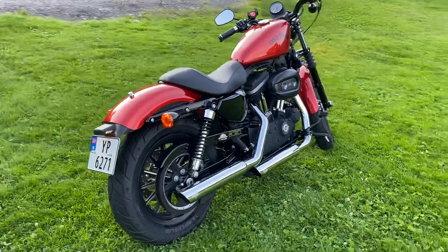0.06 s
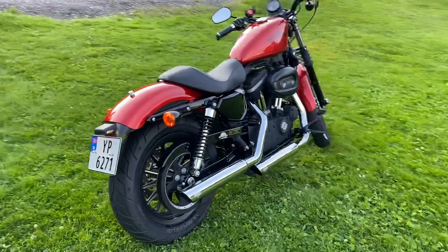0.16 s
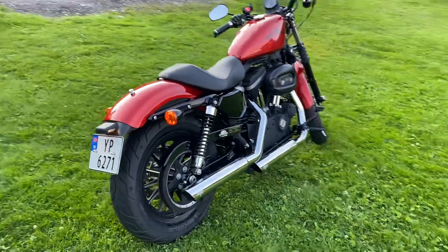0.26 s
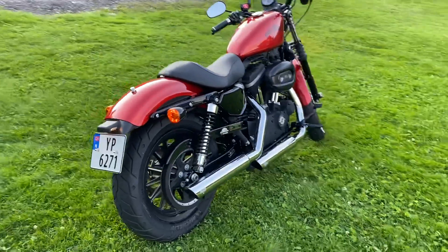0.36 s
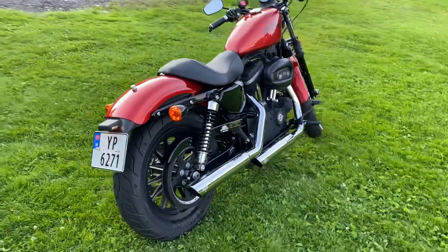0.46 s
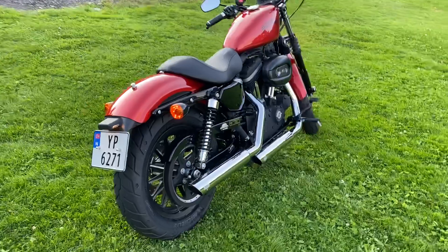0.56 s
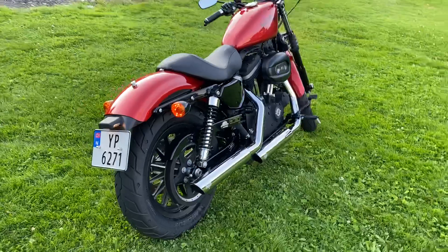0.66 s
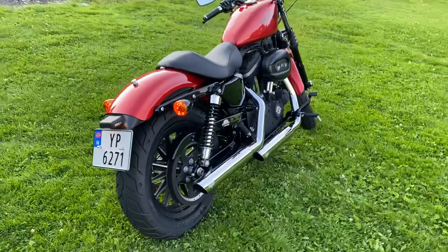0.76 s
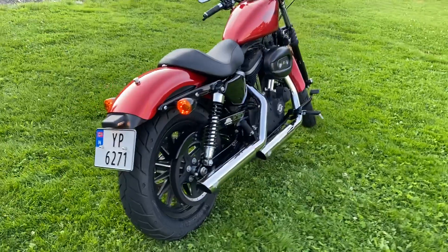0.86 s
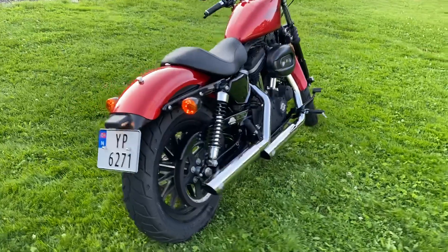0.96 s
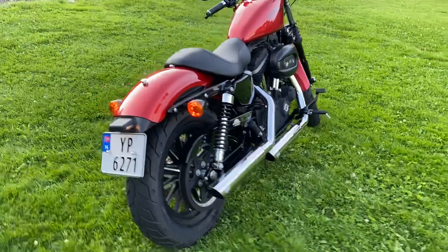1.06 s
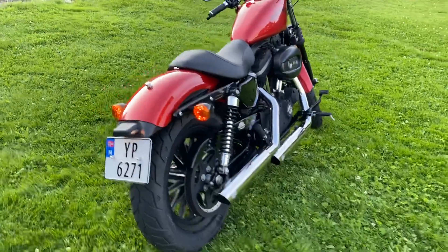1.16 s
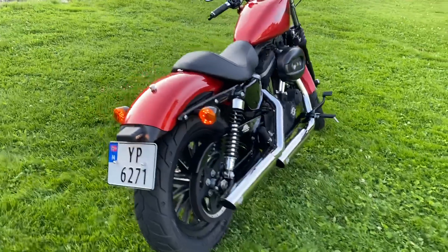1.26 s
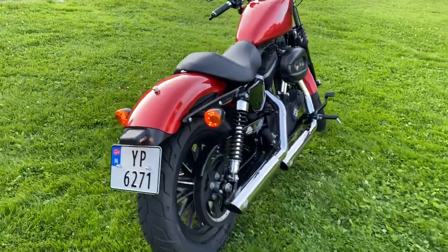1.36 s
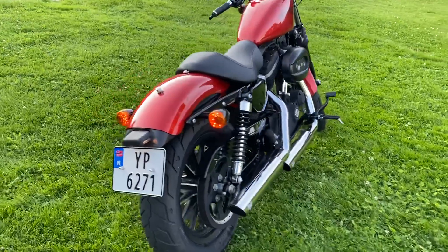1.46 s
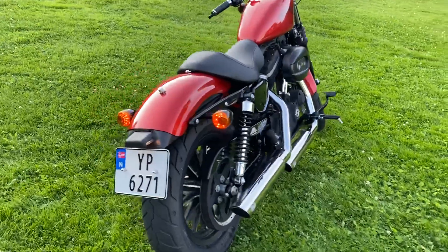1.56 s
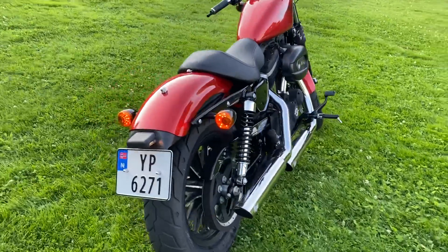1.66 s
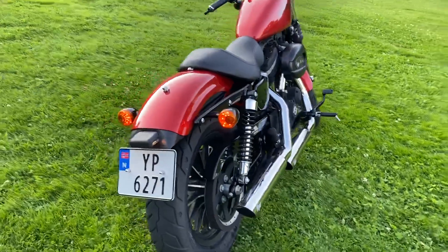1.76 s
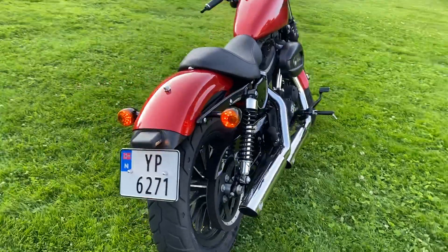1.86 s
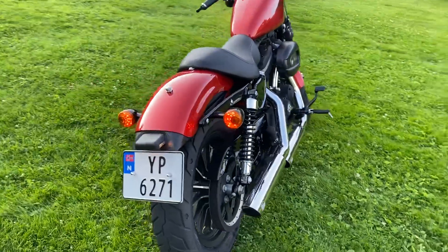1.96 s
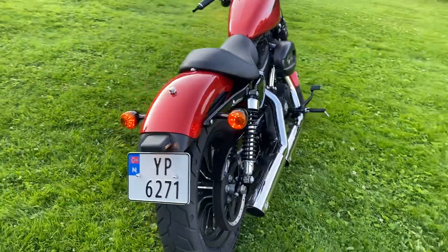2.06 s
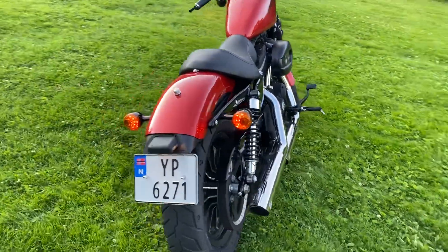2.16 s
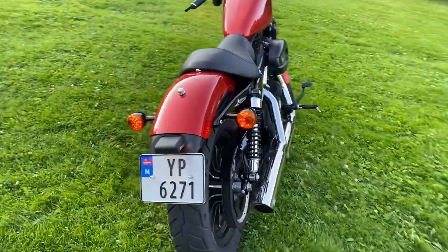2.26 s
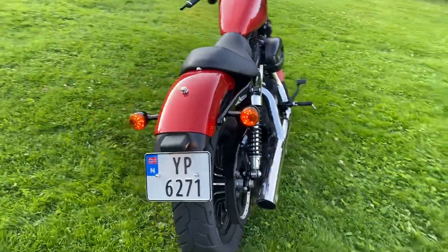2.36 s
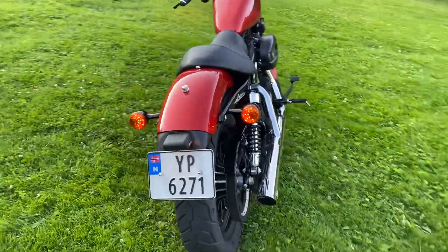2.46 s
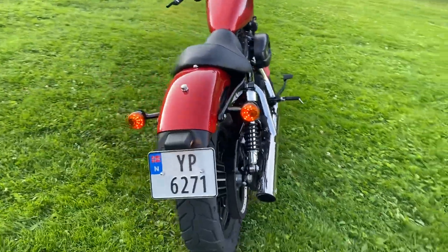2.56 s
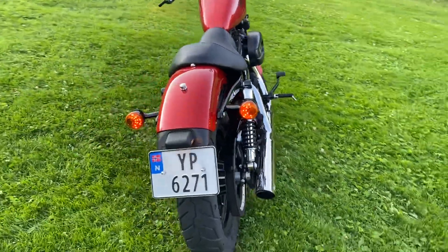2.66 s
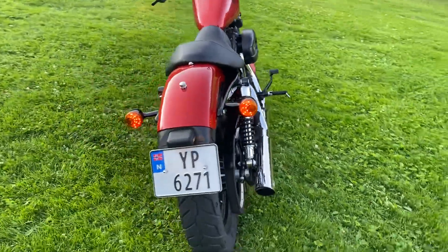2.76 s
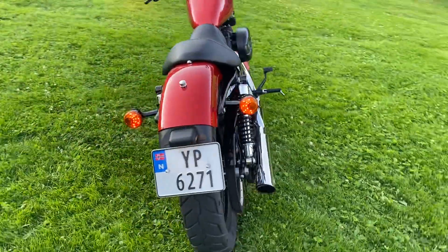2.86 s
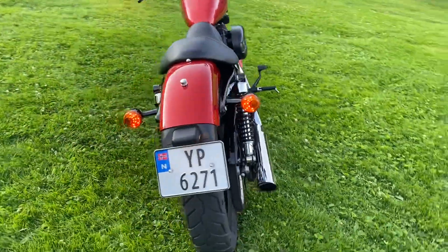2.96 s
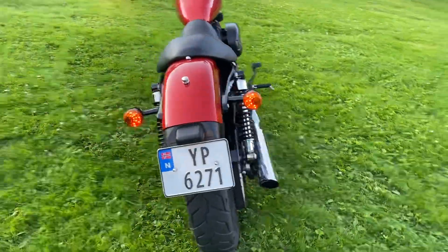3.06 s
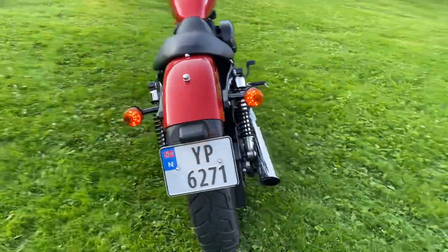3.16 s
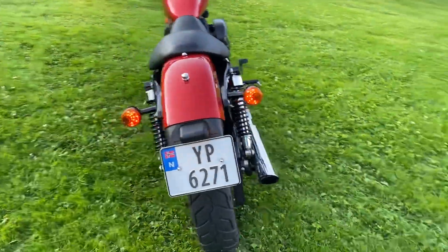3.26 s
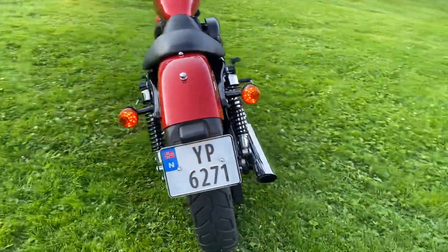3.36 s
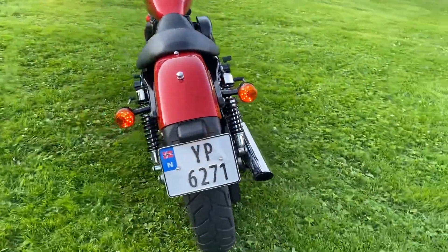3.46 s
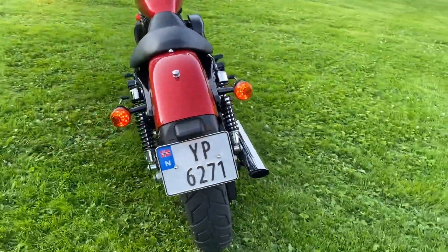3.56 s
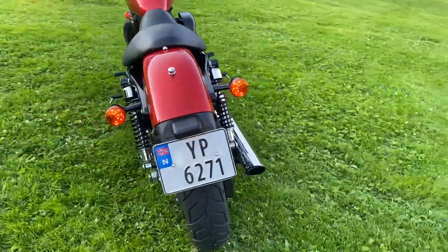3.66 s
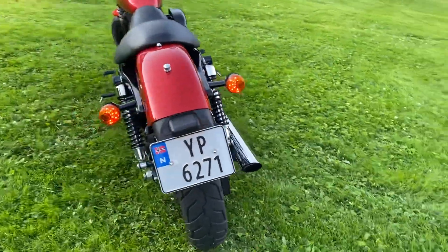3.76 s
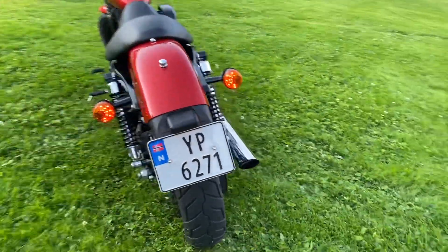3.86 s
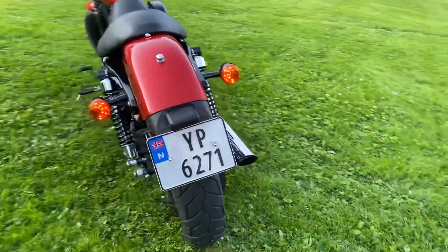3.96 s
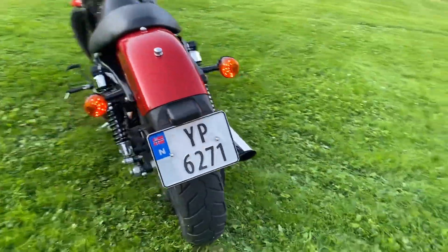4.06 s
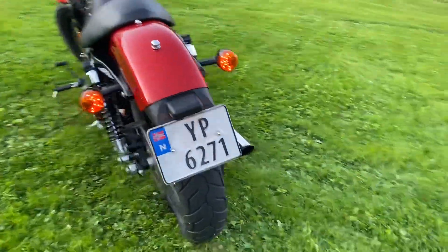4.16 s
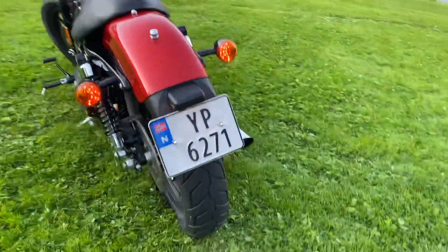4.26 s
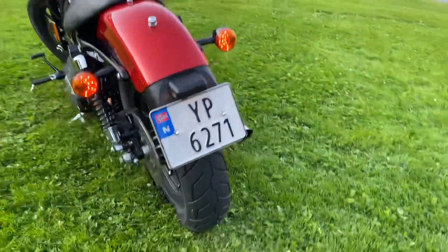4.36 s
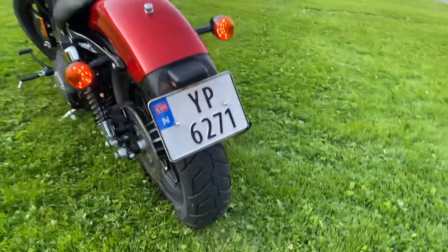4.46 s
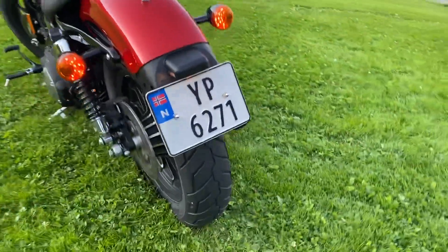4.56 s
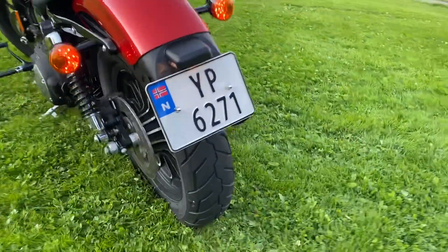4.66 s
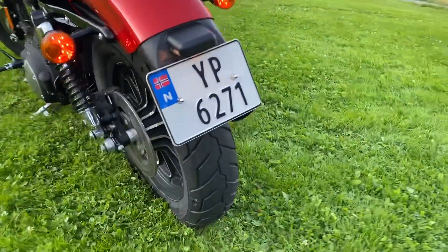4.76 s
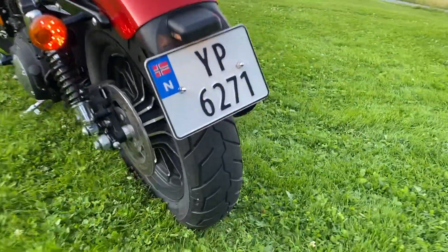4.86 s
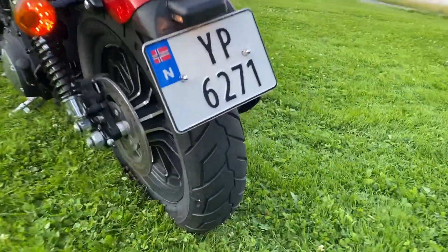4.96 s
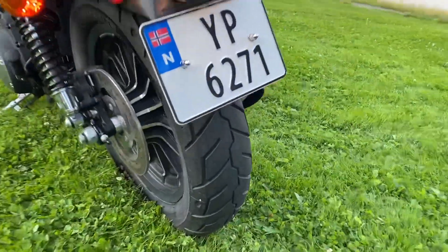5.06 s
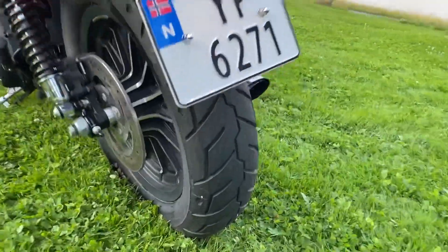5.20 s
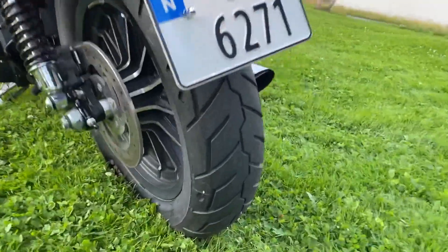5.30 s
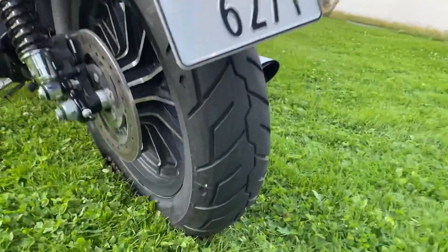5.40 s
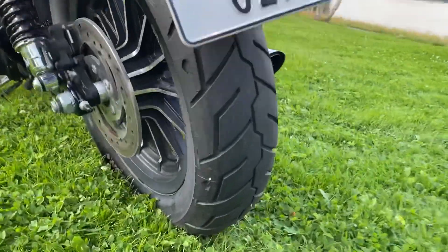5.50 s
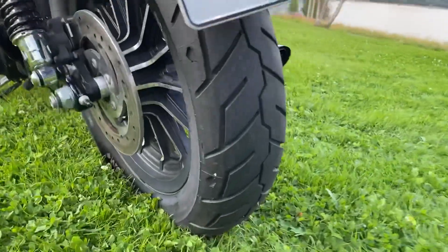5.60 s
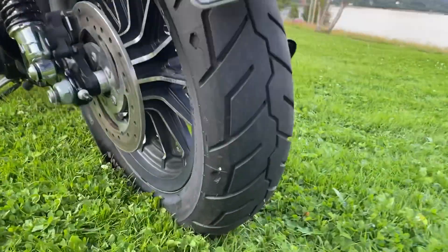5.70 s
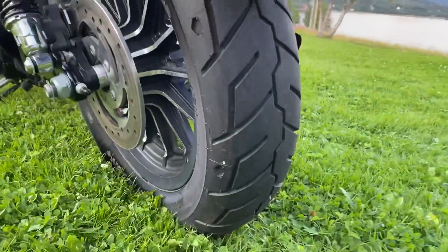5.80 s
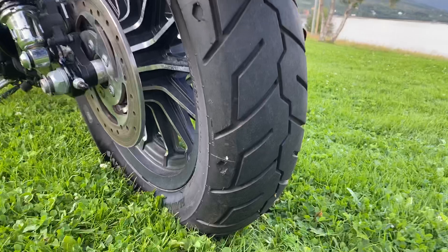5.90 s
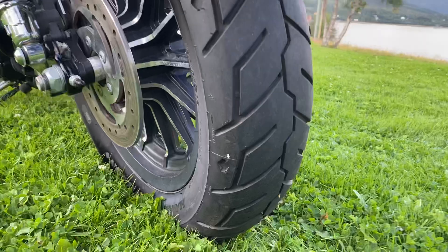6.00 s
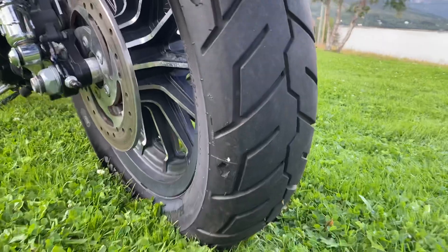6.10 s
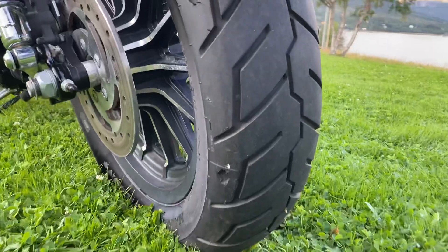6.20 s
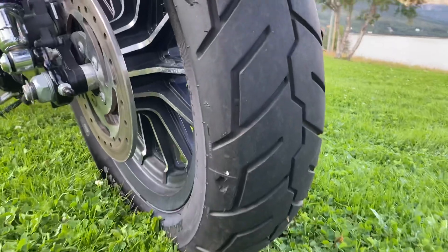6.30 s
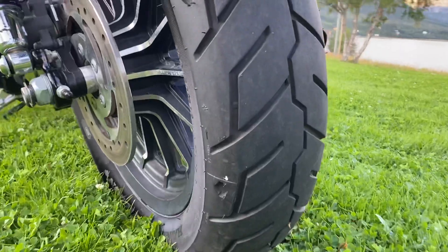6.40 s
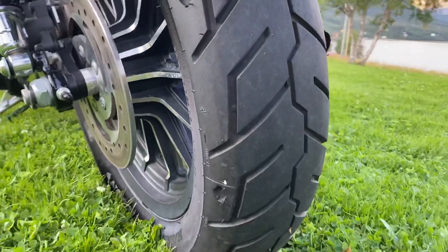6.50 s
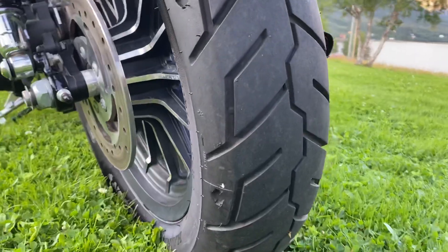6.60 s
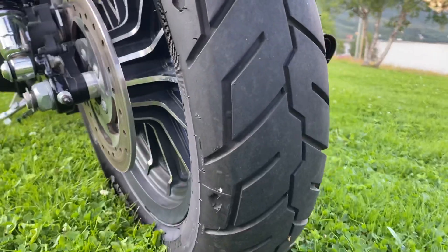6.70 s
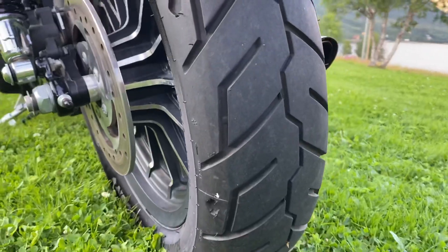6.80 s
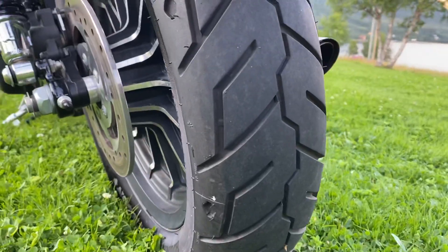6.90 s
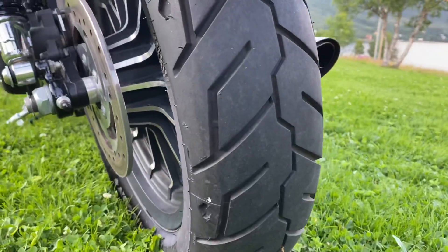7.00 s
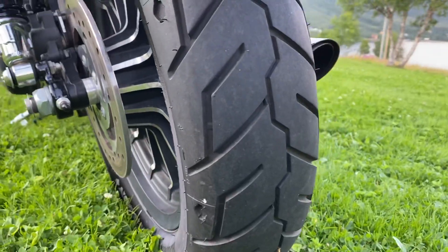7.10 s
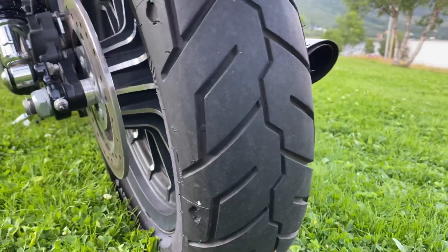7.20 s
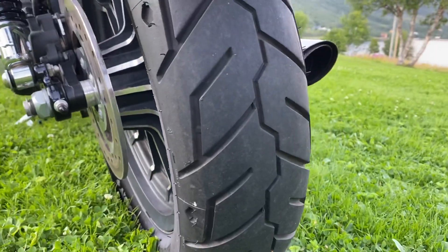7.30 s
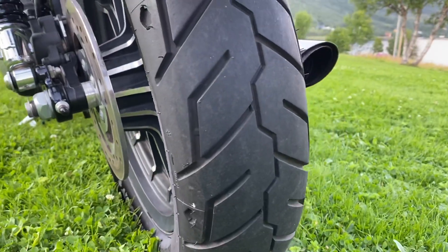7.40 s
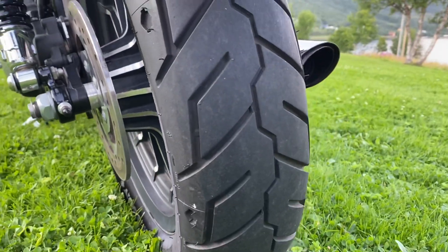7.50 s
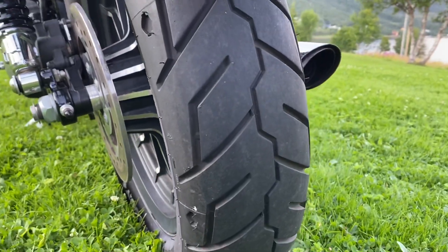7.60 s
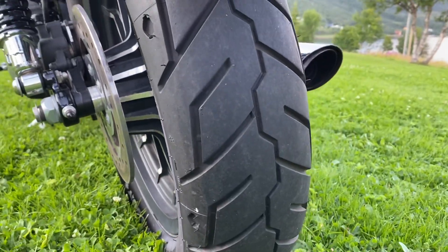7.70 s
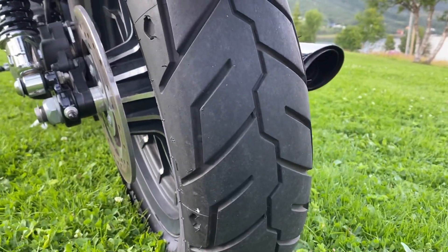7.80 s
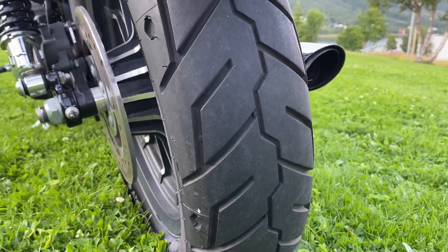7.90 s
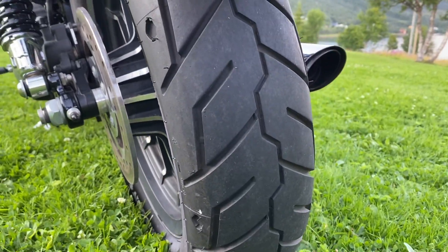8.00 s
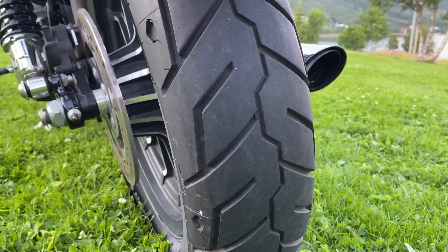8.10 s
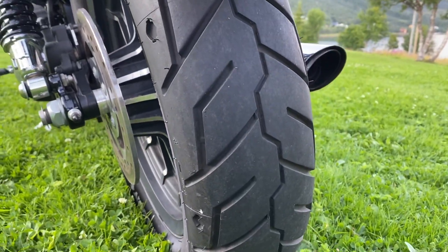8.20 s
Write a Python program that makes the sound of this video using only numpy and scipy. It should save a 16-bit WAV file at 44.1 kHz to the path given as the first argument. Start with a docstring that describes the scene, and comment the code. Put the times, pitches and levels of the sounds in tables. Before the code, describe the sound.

Close outdoor idle of a big two-cylinder motorcycle: fast loping exhaust thumps, sharp hissing cracks and light valve clatter, growing heavier near the pipe.

```python
"""On a lawn a V-twin motorcycle idles; the microphone circles behind it and comes down by the rear wheel.
Each exhaust stroke drives gas surges through a resonant silencer, heard as a thump, and a turbulent jet
out of the pipe mouth, heard as bark, crack and hiss. The pipe end and the hollow machine ring briefly.
One cylinder fires every cycle; the other mostly misses every second one and then cracks harder.
Shaped noise gives the clatter of the valve gear and the rumble of the engine case beneath."""
import sys
import numpy as np
from scipy import signal
from scipy.fft import rfft, irfft, next_fast_len
from scipy.io import wavfile

SR = 44100
rng = np.random.default_rng(int(sys.argv[2]) if len(sys.argv) > 2 else 0)


def generate_wav(sig):
    """Save sig (samples, or channels by samples) to the path in sys.argv[1] as 16-bit PCM at SR."""
    pcm = np.round(np.clip(np.atleast_2d(sig).T, -1, 1) * 32767).astype(np.int16)
    wavfile.write(sys.argv[1], SR, pcm)


N = 363825

# exhaust strokes of a burnt charge: start_s, crack_db, bark_db (relative levels)
STEADY_FIRES = [(0.0149, -24, -19.5), (.1116, -21.5, -18), (.2098, -23.5, -21.5), (.3055, -26, -24.5),
                (0.399, -21.5, -16), (.4944, -26, -19.5), (.5932, -25.5, -23.5), (.693, -26.5, -22.5),
                (0.79, -25.5, -20), (.8858, -25.5, -24), (.983, -25, -23), (1.0793, -25, -23),
                (1.1759, -24.5, -21.5), (1.2747, -26, -21.5), (1.371, -27, -21.5), (1.4681, -23.5, -22),
                (1.5644, -26, -21), (1.66, -24, -21), (1.7554, -23.5, -24), (1.8506, -23.5, -21.5),
                (1.9441, -19, -15.5), (2.0392, -20, -18.5), (2.1359, -20, -17.5), (2.2347, -25, -23.5),
                (2.3359, -25, -20.5), (2.4363, -23.5, -16.5), (2.5352, -24, -20.5), (2.6327, -23.5, -21),
                (2.732, -23.5, -20), (2.8332, -24.5, -21), (2.9331, -25, -20), (3.03, -23.5, -23),
                (3.1272, -27, -24), (3.225, -29, -21.5), (3.3226, -27.5, -18.5), (3.4235, -37, -25),
                (3.5194, -32, -25), (3.6135, -34, -21.5), (3.7087, -31, -21), (3.8054, -32.5, -22.5),
                (3.9007, -33, -20), (3.998, -36.5, -21.5), (4.0958, -32, -21.5), (4.1947, -37, -20.5),
                (4.2939, -33, -19.5), (4.3944, -38, -24), (4.4909, -33.5, -19), (4.5878, -32, -18.5),
                (4.687, -34, -19.5), (4.787, -33.5, -19.5), (4.8845, -34.5, -21), (4.9811, -35, -18.5),
                (5.0806, -32.5, -17), (5.1849, -33, -20.5), (5.2858, -29.5, -18), (5.386, -29, -17),
                (5.4846, -28, -18), (5.5847, -27, -19.5), (5.6857, -29, -20), (5.788, -31, -19.5),
                (5.888, -31, -23.5), (5.986, -29, -20.5), (6.0817, -27, -22), (6.1765, -24, -19.5),
                (6.271, -30.5, -24), (6.3669, -27.5, -22.5), (6.4674, -26.5, -24), (6.563, -28.5, -25.5),
                (6.6604, -27.5, -21), (6.7556, -26.5, -26), (6.8513, -29, -17.5), (6.9496, -26.5, -21.5),
                (7.0497, -23.5, -19), (7.1495, -24, -21), (7.2497, -25.5, -21.5), (7.3486, -25, -22),
                (7.4482, -24.5, -20.5), (7.5457, -24, -18), (7.645, -24, -20), (7.746, -24, -21),
                (7.847, -25.5, -21.5), (7.9461, -22, -17), (8.0488, -24.5, -21.5), (8.1513, -26.5, -22)]
LAZY_FIRES = [(0.153, -25, -19), (.345, -24, -21), (.5359, -22.5, -20.5), (0.7347, -26, -22),
              (.927, -23, -19), (1.023, -30.5, -23), (1.119, -26, -21.5), (1.2163, -32, -25.5),
              (1.315, -24.5, -21), (1.5101, -16, -16), (1.701, -17.5, -16.5), (1.891, -16.5, -16),
              (2.0807, -15, -16), (2.2781, -13, -15.5), (2.4795, -18, -16), (2.6749, -17, -15),
              (2.8756, -22.5, -19.5), (2.9725, -31.5, -28.5), (3.0708, -22.5, -22.5), (3.167, -33.5, -34),
              (3.2662, -23, -20.5), (3.4646, -20, -20.5), (3.6538, -18.5, -17), (3.8465, -19.5, -18.5),
              (4.0391, -18.5, -16.5), (4.2372, -19, -16.5), (4.4361, -17, -18.5), (4.6292, -18.5, -22),
              (4.8283, -25, -20.5), (5.023, -18.5, -16), (5.2283, -16, -13), (5.4283, -17, -17),
              (5.6279, -15.5, -16.5), (5.8305, -15, -15.5), (6.027, -16, -15.5), (6.2171, -15, -13.5),
              (6.4089, -17, -22), (6.5077, -21, -22.5), (6.7011, -16, -16.5), (6.893, -14, -14),
              (7.0928, -14.5, -14.5), (7.2916, -15, -15.5), (7.4899, -17, -16.5), (7.6877, -15.5, -17),
              (7.7881, -25, -31), (7.8885, -18, -19), (8.0916, -14.5, -15)]
# how the two pipes are heard over time: start_s, steady_thump_db, lazy_thump_db, miss_thump_db,
# steady_hiss_over_crack_db, lazy_hiss_over_crack_db, miss_crack_db
PIPE_LEVELS = [(0, 3, 4.5, 3, 3.5, 9, -48), (.7, 3, 4, 3, 5, 5.5, -48), (1.5, 2.8, 3.5, 4, 1.8, 2.2, -46),
               (2.3, 2.8, 3.5, 2.9, -2, -0.3, -45), (3.4, 2.5, 4, 3.5, 4.5, 6, -43),
               (4.5, 3, 5.5, 4.3, -1.5, 4, -46), (5.7, 5, 6.5, 6.5, 1.5, 4.5, -44.5),
               (6.4, 5, 6, 6, .3, 1.8, -40), (7.2, 4.5, 7, 7, -1, 3.2, -36.5),
               (8.25, 4, 5.5, 5.5, -5, 2.5, -45)]
# where the microphone is: start_s, pipe_end_front_db, pipe_end_return_db, clatter_db, rumble_db
MICROPHONE_PLACE = [(0, -20, -42, -41.5, -30), (.8, -25, -40, -42, -32), (1.6, -27, -33, -40.5, -31),
                    (2.4, -25, -33, -43.5, -32), (3.2, -35, -35.5, -46.5, -31.5),
                    (4.0, -18, -34, -47.5, -33), (4.7, -18.5, -26, -47, -32.5),
                    (5.2, -14, -18, -44.5, -29.5), (5.8, -7, -10, -44, -27), (6.5, -11.5, -15, -45, -29),
                    (7.3, -8, -10.5, -44.5, -28), (8.25, -11, -19.5, -47.5, -29.5)]

# gas surges of one stroke: offset_ms from the stroke's time (negative = earlier), rise_ms,
# volume_ms (height times duration; negative = drawn back)
STEADY_SURGES = [(-.27, 2.99, -9.22), (-2.3, 10., 33.2), (24.36, 1.38, -.5), (20.07, 10., -5.16)]
LAZY_SURGES = [(2.49, .71, -1.15), (10.02, 4.64, 3.77), (-1.71, .3, .25), (25.64, 1.7, -.73)]
MISS_SURGES = [(-2.06, 10., 16.73), (9.52, 3.25, -.81), (25.98, 7.47, 10.), (34.87, 10., 6.47)]
# rings of the pipe end: offset_ms from the stroke's time (negative = earlier), sign, pitch_hz, t60_s
PIPE_END_RINGS = [(-1.65, 1, 273, .06), (4.22, -1, 357, .045)]
# resonances of the engine case: pitch_hz, width_hz
CASE_RESONANCES = [(460, 46), (665, 160), (880, 2.8), (1175, 16), (1550, 170), (1980, 9.7), (2480, 24),
                   (2850, 48), (3120, 33), (3390, 40), (4250, 200), (6050, 100)]

# noise spectra: frequency_hz, density_db (relative, per Hz)
CRACK_SPECTRUM = [(1400, -20), (2000, -3), (2500, -2.5), (3100, 1.5), (4000, 0), (5100, -7), (6200, -4.5),
                  (7100, -6), (8500, -2), (10300, -6), (13000, -3), (14800, -4), (15700, -7), (16400, -6)]
BARK_SPECTRUM = [(200, 7.5), (350, -6.5), (500, 0.5), (700, -2.5), (850, -2.5), (1150, -1.5), (1500, -9.5),
                 (2200, -31.5)]
CLATTER_SPECTRUM = [(1400, -0.5), (2000, 2.5), (3200, 2), (5000, -5.5), (6300, -6), (8500, -9),
                    (11000, -10.5), (13000, -18), (15600, -15), (16400, -34)]
RUMBLE_SPECTRUM = [(250, 10), (350, -5), (500, -4), (750, -6), (1100, -8), (1700, -24.5), (2200, -12.5),
                   (3000, -57)]

# likeness of the two microphone ports: frequency_hz, likeness (0-1)
PORT_LIKENESS = [(200, 1), (600, 0.83), (1200, 0.57), (1800, 0.15), (3000, 0.74), (3800, 0.93), (5100, 0.4),
                 (6800, 0.86), (9000, 1), (10200, 0.95), (11200, 0.65), (13300, .99), (14600, 0.79),
                 (15400, 0.71)]
# phase between the ports: frequency_hz, right_lead_rad
PORT_LEAD = [(200, 0), (900, -.8), (1400, -1.2), (2200, .3), (3000, 0), (7000, .1), (9050, 3.14),
             (10900, 6.25), (11300, 6.4), (13300, 9.42), (15100, 12.5), (16000, 12.6)]
# level of left minus right: frequency_hz, balance_db
PORT_BALANCE = [(60, 4), (110, -13), (200, -5.5), (380, -2.5), (700, -1.0), (1290, 2), (2380, 1.5),
                (4400, -1), (8120, 0.0), (15000, 0)]

MISS_AT = .443   # a cycle in which the lazy cylinder misses pushes cold gas out at this share of the cycle
STEADY_THUMP_SPREAD_DB = 0.35
FULL_CRACK_DB, THUMP_FOLLOWS = -16, 0.12   # lazy cylinder: the thump loses this share of what a weak crack lacks
# a poorly filled cylinder misses softly and then fires weakly: shares of that fire's loss
THUMP_FILLS, PUFF_FILLS = 0.22, 0.53
MISS_HISS_DB, MISS_BARK_DB, MISS_SPREAD_DB = 3.5, 1, 3   # hiss over that of a fire, bark over the crack
SEAT_S, SEAT_DB = .029, -5.5   # a valve seats this long after the stroke's time; mean tick over the clatter
CHAMBER = (202.4, 2.57)   # resonance of the silencer (Hz, Q)
PACKING_HZ = 278   # the packing of the silencer swallows the thump above this
# microphone chain, each pair (Hz, Q): a low cut, and two all-pass stages that delay the lows
LOW_CUT, SLOW_STAGES = (67.4, 1.94), [(53.1, .4), (240.5, 3.55)]
CUTOFF_HZ = 16900
SIZE = next_fast_len(N + SR)
HZ = np.maximum(np.arange(SIZE // 2 + 1) * SR / SIZE, 1e-3)   # above zero, for the logarithm


def from_db(db):
    """Logarithmic level: decibels to amplitude gain."""
    return 10 ** (np.asarray(db) / 20)


def at_hz(points):
    """Interpolation along log frequency: a table read at every spectral bin."""
    hz, values = np.transpose(points)
    return np.interp(np.log(HZ), np.log(hz), values)


def clicks(s, heights):
    """Impulse train: one sample for each time, over a negligible constant."""
    out = np.zeros(N) + 1e-18
    np.add.at(out, np.clip(np.round(s * SR).astype(int), 0, N - 1), heights)
    return out


def swell(x, rise_ms):
    """Critically damped response: each click becomes a hump t exp(-t / rise) of height 1."""
    r = np.exp(-1000 / (rise_ms * SR))
    return signal.lfilter([np.e * (1 - r)], [1, -2 * r, r * r], x)


def ring(blows, hz, t60):
    """Damped resonator: each blow starts a sine that falls 60 dB in t60 seconds."""
    r, w = from_db(-60 / (t60 * SR)), 2 * np.pi * hz / SR
    return signal.lfilter([0, np.sin(w)], [1, -2 * r * np.cos(w), r * r], blows)


def pipes_at(s):
    """Linear interpolation in time of the six level columns of the pipes."""
    start_s, *columns = np.transpose(PIPE_LEVELS)
    return [np.interp(s, start_s, column) for column in columns]


def exhaust_strokes():
    """Firing order and cylinder filling: rows (s, thump dB, crack dB, hiss dB, bark dB)
    of steady fires, lazy fires and lazy misses."""
    s, crack, bark = np.transpose(STEADY_FIRES)
    thump_db, _, _, hiss, _, _ = pipes_at(s)
    vary = rng.standard_normal((len(s), 3))
    steady = [s, thump_db + STEADY_THUMP_SPREAD_DB * vary[:, 0], crack, crack + hiss, bark]

    fired, crack, bark = np.transpose(LAZY_FIRES)
    _, thump_db, _, _, hiss, _ = pipes_at(fired)
    loss = crack - FULL_CRACK_DB
    lazy = [fired, thump_db + THUMP_FOLLOWS * loss, crack, crack + hiss, bark]

    # a cycle begins with a steady fire; without a lazy fire in it, it holds a miss
    fired_cycles = np.searchsorted(s, fired) - 1
    missed = ~np.isin(np.arange(len(s)), fired_cycles)
    cycle = np.diff(s)
    cold = (s + MISS_AT * np.append(cycle, cycle[-1]))[missed]
    next_fire = np.minimum(np.searchsorted(fired, cold), len(fired) - 1)
    filling = loss[next_fire]   # told by the fire that follows
    _, _, thump_db, _, hiss, crack = pipes_at(cold)
    crack, bark = crack + PUFF_FILLS * filling + MISS_SPREAD_DB * vary[missed, 1:].T
    misses = [cold, thump_db + THUMP_FILLS * filling,
              crack, crack + hiss + MISS_HISS_DB, bark + MISS_BARK_DB]
    return [np.transpose(rows) for rows in (steady, lazy, misses)]


def colour(spectrum, case_db=-60):
    """Spectral shaping: gain of mean power 1; resonances of the engine case stand case_db out of it."""
    peaks = sum(1 / (1 + (2 * (HZ - hz) / width) ** 2) for hz, width in CASE_RESONANCES)
    audible = HZ > spectrum[0][0] / 2
    gain = from_db(at_hz(spectrum)) * audible * np.sqrt(1 + peaks * from_db(case_db) ** 2)
    return gain / np.sqrt(np.mean(gain ** 2))


def bands(low, high, count):
    """Power-complementary filter bank: centres and overlapping windows whose powers add up to 1."""
    centres = np.geomspace(low, high, count)
    place = np.interp(np.log(HZ), np.log(centres), np.arange(count))
    return [(hz, np.cos(np.clip(place - k, -1, 1) * np.pi / 2)) for k, hz in enumerate(centres)]


def rattle(depth_db, hz):
    """Random amplitude modulation: the quick uneven level of many small contacts."""
    wobble = signal.sosfilt(signal.butter(2, hz, fs=SR, output="sos"), rng.standard_normal(N))
    return from_db(depth_db * wobble / wobble.std())


def ticks(per_s, decay_ms):
    """Poisson impacts: tappets and chain links touch at random; each contact dies away quickly."""
    born = (rng.random(N) < per_s / SR) * rng.exponential(1, N)
    return signal.lfilter([1], [1, -np.exp(-1000 / (decay_ms * SR))], born)


def valve_seats(s):
    """Impact excitation: valves land on their seats, each with a short tick of its own strength."""
    level_db = SEAT_DB + 4.2 * rng.standard_normal(len(s))
    return swell(clicks(s + SEAT_S, from_db(level_db)), 1.3)


def valve_shut(s, level_db):
    """Pulsed flow: a dull puff when the exhaust valve closes, late in each stroke."""
    puff_db = level_db + 1.0 * rng.standard_normal(len(s))
    return swell(clicks(s + 0.0265, from_db(puff_db)), 4.0)


def engine_body(strokes, clatter_db, rumble_db):
    """Structure-borne noise: valve gear clatters, the case rumbles, each band uneven in its own way."""
    s = np.concatenate(strokes)[:, 0]
    contacts = rattle(depth_db=1.0, hz=119) + 0.46 * ticks(per_s=60., decay_ms=3.2) + valve_seats(s)
    puffs = 1 + valve_shut(s, level_db=-5.0)
    layers = []
    for _, window in bands(2600, 8800, count=3):
        envelope = from_db(clatter_db) * contacts * rattle(depth_db=3.0, hz=30)
        layers.append((envelope, window * colour(CLATTER_SPECTRUM, case_db=3.0)))
    for _, window in bands(490, 960, count=2):
        envelope = from_db(rumble_db) * puffs * rattle(depth_db=2.5, hz=24.3)
        layers.append((envelope, window * colour(RUMBLE_SPECTRUM, case_db=6.5)))
    return layers


def jet(s, peak_db, early_s, rise_ms, tail_ms, tail_db):
    """Jet noise envelope: a quick burst and a weaker outflow behind it."""
    start = clicks(s - early_s, from_db(peak_db))
    burst = swell(swell(start, rise_ms), rise_ms) / (rise_ms * SR / 1000 * np.e)
    return 1.13 * burst + from_db(tail_db) * swell(start, tail_ms)


def gas_jets(strokes):
    """Turbulent mixing: bark, crack and hiss of each stroke, every one with a colour of its own."""
    s, _, crack_db, hiss_db, bark_db = np.concatenate(strokes).T
    vary = rng.standard_normal((len(s), 14))   # ten upper bands, then four bark bands
    ragged = rattle(depth_db=2.5, hz=402)
    layers = []
    for k, (hz, window) in enumerate(bands(2186, 12920, count=10)):
        band_db = crack_db + 4.0 if hz < 5000 else hiss_db
        envelope = jet(s, band_db + 3.27 * vary[:, k],
                       early_s=0.0022, rise_ms=1.176, tail_ms=5.73, tail_db=-14.5)
        layers.append((ragged * envelope, window * colour(CRACK_SPECTRUM, case_db=0.0)))
    for k, (_, window) in enumerate(bands(442, 1417, count=4)):
        envelope = jet(s, bark_db + 2.0 * vary[:, -k - 1],
                       early_s=0.0052, rise_ms=2.36, tail_ms=6.9, tail_db=-7.0)
        layers.append((envelope, window * colour(BARK_SPECTRUM, case_db=-2.5)))
    return layers


def pole(hz, q):
    """Second-order resonance: its characteristic polynomial at every bin."""
    s = 1j * HZ
    return s * s + s * hz / q + hz * hz


def silencer():
    """Chamber resonance and absorption: the gain over frequency of chamber and packing."""
    return CHAMBER[0] ** 2 / pole(*CHAMBER) / np.sqrt(1 + (HZ / PACKING_HZ) ** 12)


def microphone_chain():
    """Low cut and phase delay: weakens the deepest bass and delays the lows without further loss."""
    path = ((1j * HZ) ** 2 / pole(*LOW_CUT)) ** 2
    for hz, q in SLOW_STAGES:
        path = path * (np.conj(pole(hz, q)) / pole(hz, q)) ** 2
    return path


def thump(strokes):
    """Pulsating volume flow: the surges of every stroke, a little different each time."""
    flow = np.zeros(N)
    for rows, surges in zip(strokes, (STEADY_SURGES, LAZY_SURGES, MISS_SURGES)):
        vary = from_db(.3 * rng.standard_normal((len(rows), 4)))
        for k, (ms, rise_ms, volume) in enumerate(surges):
            height = volume / (rise_ms * np.e)   # the hump's area is e times height times rise
            starts = clicks(rows[:, 0] + ms / 1000, height * vary[:, k] * from_db(rows[:, 1]))
            flow += swell(starts, rise_ms)
    return irfft(rfft(flow, SIZE) * silencer() * microphone_chain(), SIZE)[:N]


def tailpipe(strokes, levels_db):
    """Open-end reflection: a burnt charge's front and inverted return each make the pipe end ring."""
    s = np.concatenate([rows[:, 0] for rows in strokes[:2]])   # fires only
    out, vary = np.zeros(N), rng.standard_normal((len(s), len(PIPE_END_RINGS)))
    for k, (ms, sign, hz, t60) in enumerate(PIPE_END_RINGS):
        blows = clicks(s + ms / 1000, sign * from_db(1.8 * vary[:, k]))
        out += from_db(levels_db[k]) * ring(blows, hz, t60)
    return signal.sosfilt(signal.butter(2, 900, fs=SR, output="sos"), out)


def hollow_knock(s, level_db, hz, t60):
    """Cavity resonance: the side that faces the microphone at first rings hollow under a soft blow."""
    facing_db = np.interp(s, [2.7, 3.4], [0, -10])
    blows = swell(clicks(s, from_db(level_db + facing_db)), .3) / (.3 * SR / 1000 * np.e)
    return ring(blows, hz, t60)


def knocks(strokes):
    """Impulse response: a low ring when the lazy cylinder fires, a higher one as its valve shuts on a miss."""
    _, fires, misses = strokes
    low = hollow_knock(fires[:, 0] + 0.0028, fires[:, 4] - 1.5, hz=433.0, t60=0.11)
    high = hollow_knock(misses[:, 0] + .022, level_db=-20, hz=664.0, t60=0.064)
    return low + high


def ported_noise(layers):
    """Partial coherence: noise layers (envelope, gain over frequency) as the two ports pick them up."""
    shared, left, right = sum(rfft(rng.standard_normal((3, N)) * envelope, SIZE) * gain
                              for envelope, gain in layers)
    alike = np.clip(at_hz(PORT_LIKENESS), 0, 1)
    turn = np.exp(.5j * np.interp(HZ, *np.transpose(PORT_LEAD)))   # half the lead on each side
    common = np.sqrt(alike) * shared * np.array([1 / turn, turn])
    pair = common + np.sqrt(1 - alike) * np.array([left, right])
    balance = from_db(at_hz(PORT_BALANCE) / 2 * [[1], [-1]])
    return irfft(pair * balance, SIZE)[:, :N]


def scene():
    """Superposition: thump and rings have fixed left and right levels; the noises come through the ports."""
    strokes = exhaust_strokes()
    start_s, *columns = np.transpose(MICROPHONE_PLACE)
    seconds = np.arange(N) / SR
    front_db, return_db, clatter_db, rumble_db = [np.interp(seconds, start_s, c) for c in columns]
    noises = ported_noise(engine_body(strokes, clatter_db, rumble_db) + gas_jets(strokes))
    rings = tailpipe(strokes, [front_db, return_db]) + knocks(strokes)
    return noises + thump(strokes) * from_db([[-2.6], [-1.5]]) + rings * from_db([[-1.2], [1.1]])


def record(dry):
    """Saturation and band limiting: peaks are rounded off firmly, the top is cut."""
    top, knee = 1.0, 3.0
    held = dry / (1 + np.abs(dry / top) ** knee) ** (1 / knee)
    return signal.sosfilt(signal.cheby2(12, 70, CUTOFF_HZ, fs=SR, output="sos"), held)


dry = scene()
out = record(dry)
generate_wav(out)
```